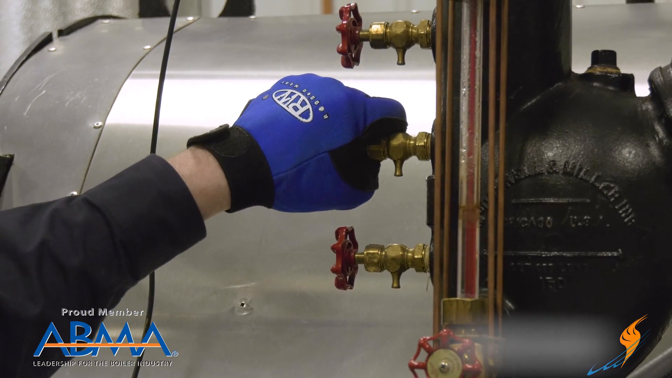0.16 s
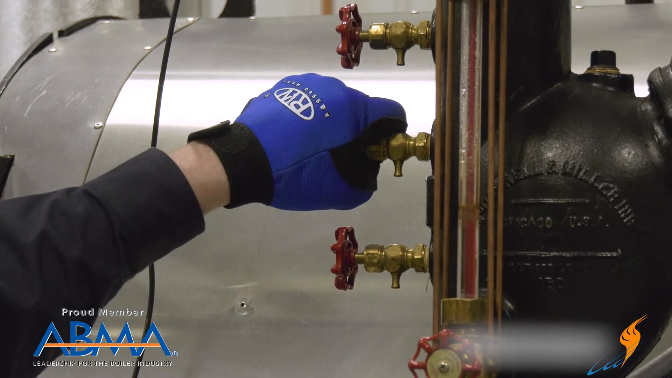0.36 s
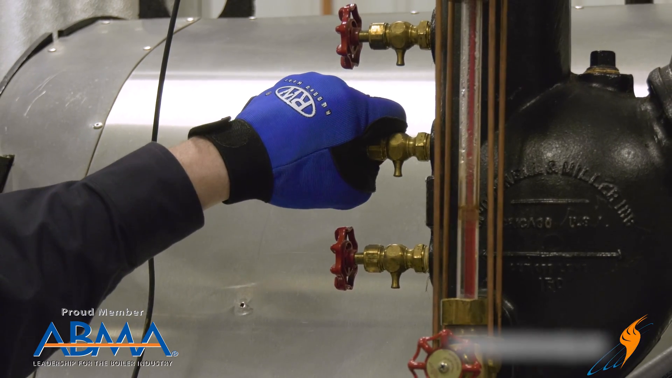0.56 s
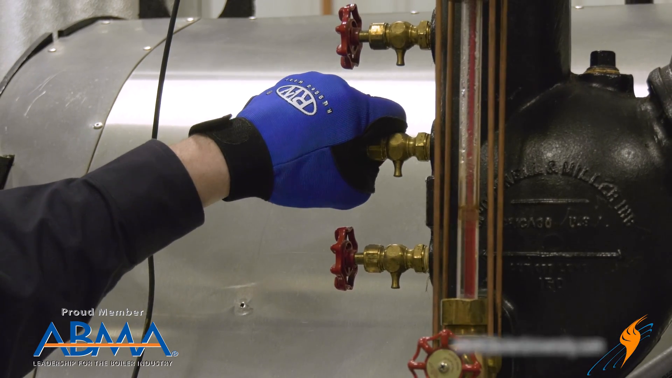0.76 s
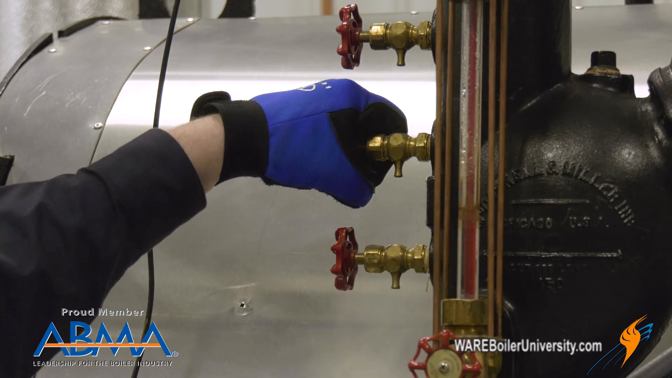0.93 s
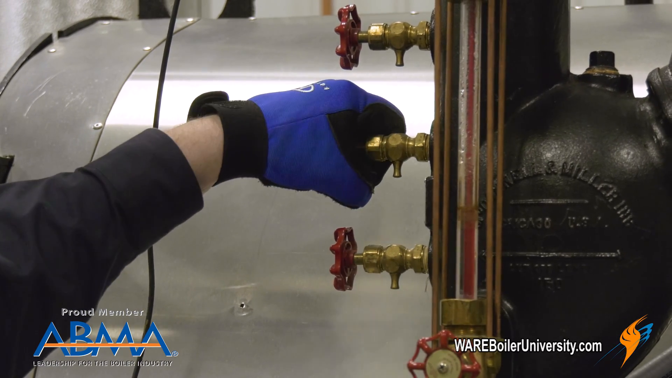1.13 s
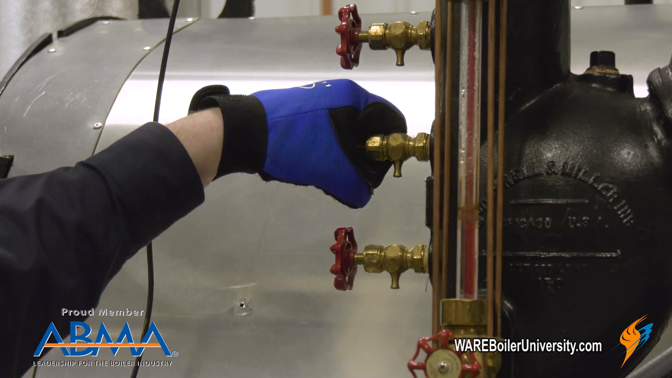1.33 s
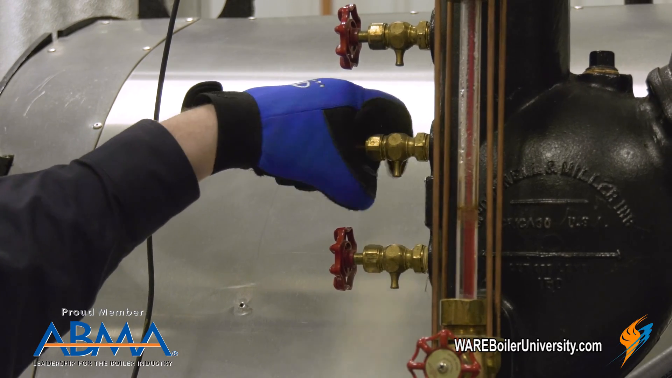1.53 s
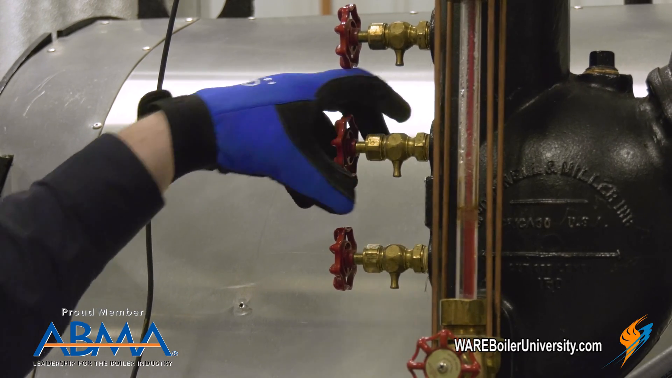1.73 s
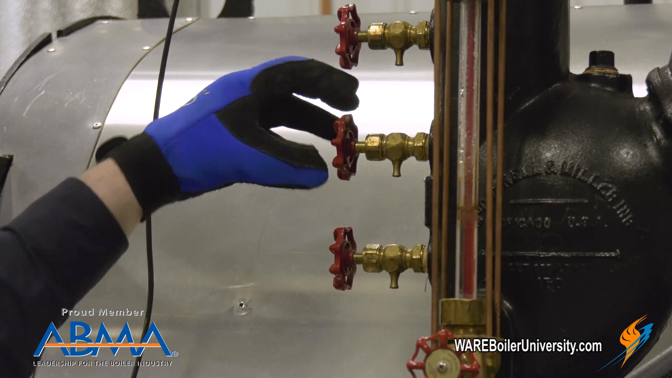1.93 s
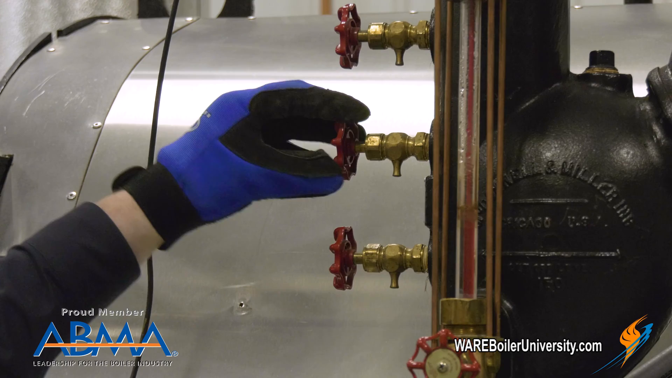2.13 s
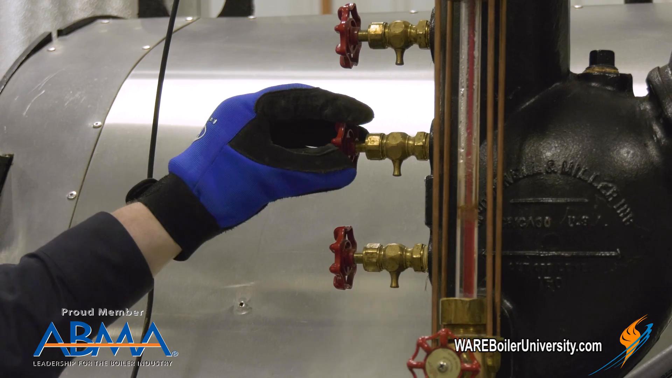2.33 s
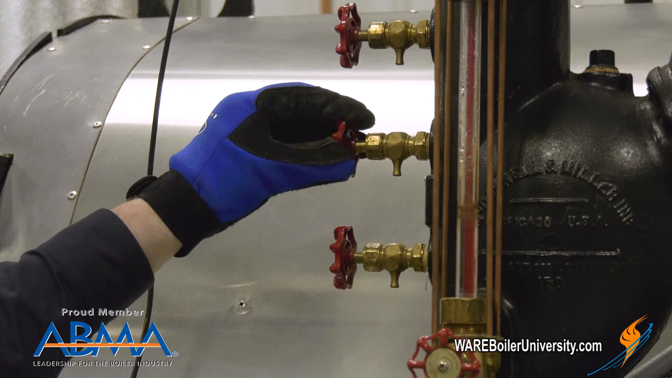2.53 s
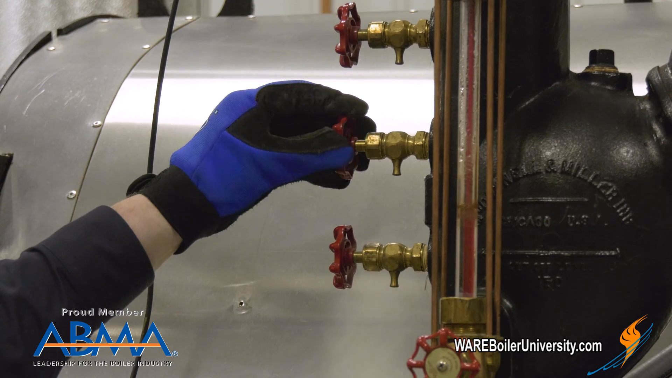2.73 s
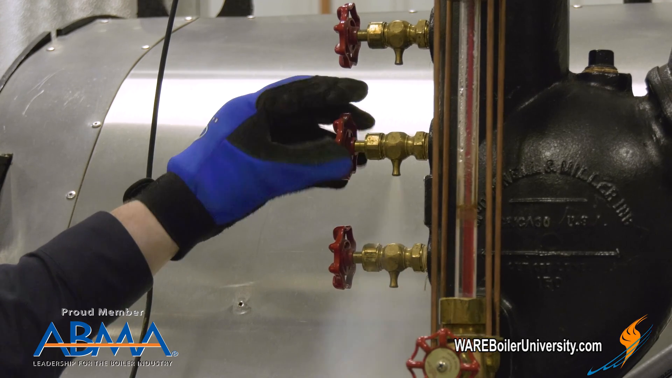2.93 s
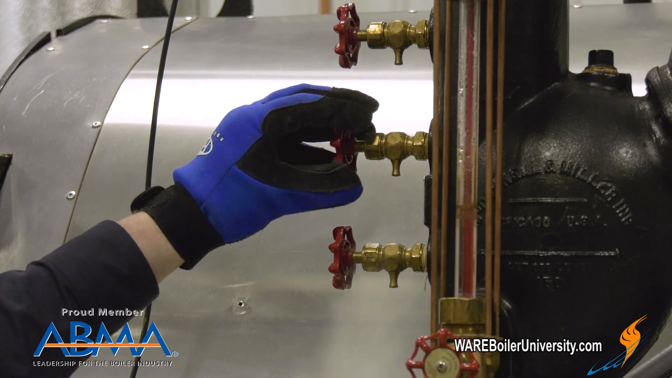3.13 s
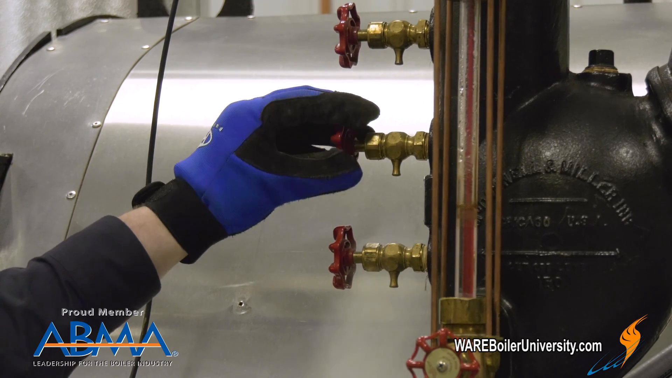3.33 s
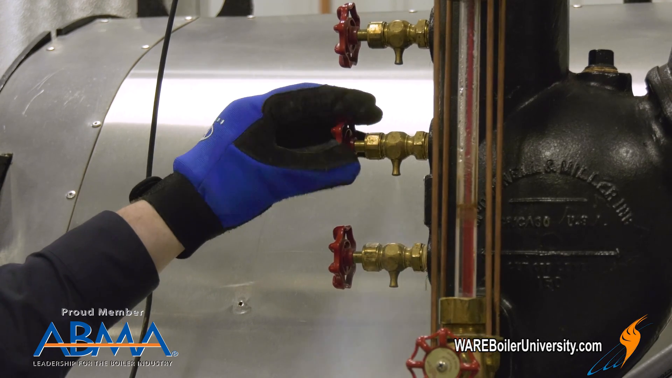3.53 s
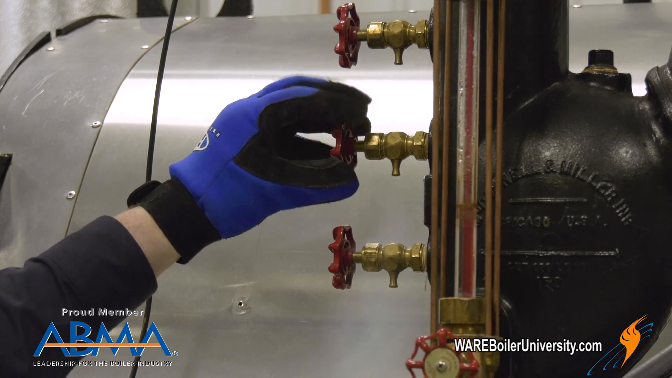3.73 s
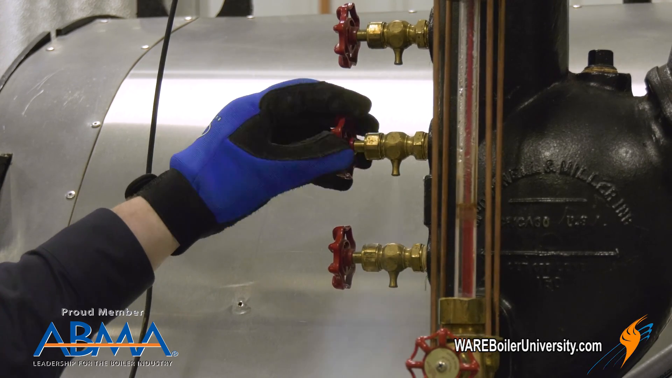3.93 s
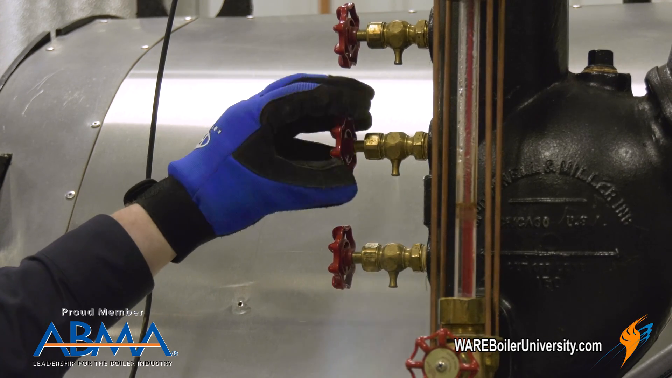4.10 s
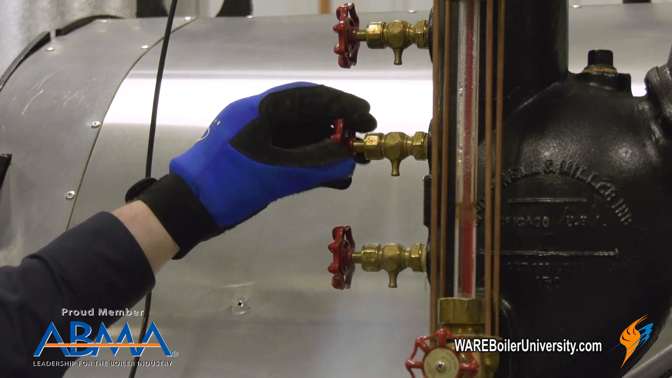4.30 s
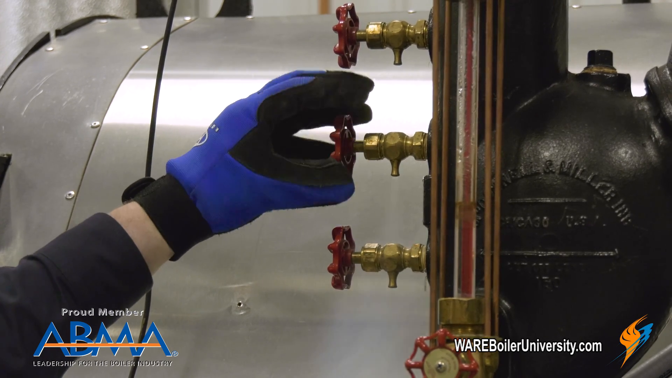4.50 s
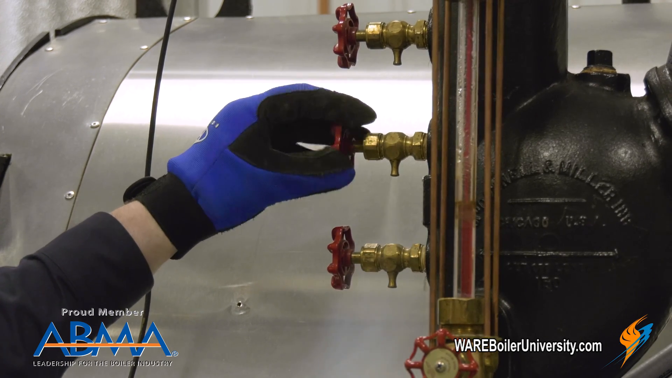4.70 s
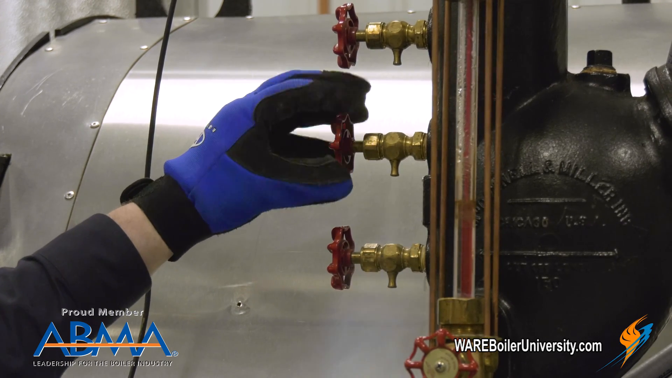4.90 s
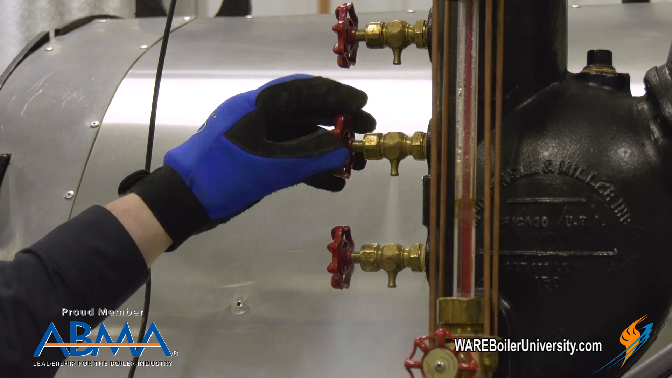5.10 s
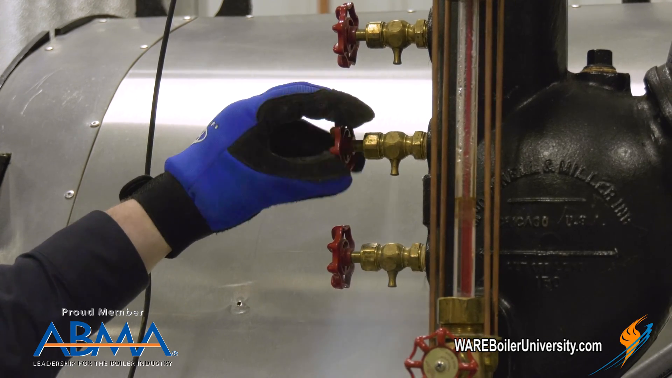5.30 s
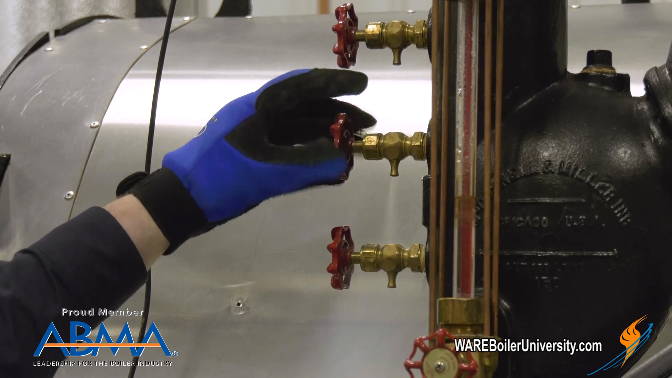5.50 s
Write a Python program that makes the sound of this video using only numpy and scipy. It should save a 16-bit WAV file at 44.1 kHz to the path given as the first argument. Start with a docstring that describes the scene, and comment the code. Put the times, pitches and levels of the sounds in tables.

```python
"""Steam hisses through a small boiler drain valve turned open by hand, and swells to a roar turn by turn.
Its jet is noise with flecks of water, coloured by the opening, the wetness and the ringing valve body.
First a slug of condensate bursts out with a falling squeal, and the valve spits: short noise bursts and
a gliding sine, with a thin room tail. All is heard close to one microphone in a workshop of steady
machinery noise, with a motor's hum and a motor drive's whine made of sines."""
import sys
import numpy as np
from scipy import signal
from scipy.fft import rfft, irfft
from scipy.io import wavfile
from scipy.ndimage import uniform_filter1d

SR = 44100
rng = np.random.default_rng(int(sys.argv[2]) if len(sys.argv) > 2 else 0)


def file_out(sig):
    """Save sig as 16-bit WAV at sys.argv[1]."""
    # one column per channel
    cols = np.atleast_2d(sig).T
    # limit, then scale
    lim = np.clip(cols, -1, 1)
    pcm = np.round(lim * 32767).astype(np.int16)
    wavfile.write(sys.argv[1], SR, pcm)


N = 244755
# the time of every sample in seconds, and the frequency of every spectrum bin in Hz
T, HZ = np.arange(N) / SR, np.fft.rfftfreq(N, 1 / SR)


def gain_of(db):
    """Turns decibels into a factor for the sound pressure."""
    return 10 ** (np.asarray(db) / 20)


def evened(x):
    """Scales a signal to an rms of 1, so that a level set later is its true loudness."""
    return x / np.sqrt(np.mean(x ** 2) + 1e-20)


def read(points, hz):
    """Reads every column of a spectrum table, in straight lines over log frequency."""
    f, *columns = np.transpose(points)
    return np.array([np.interp(np.log(hz + 1), np.log(f + 1), c) for c in columns])


def follow(rows, t):
    """Reads every column of a table of points in time, in straight lines."""
    s, *columns = np.transpose(rows)
    return np.array([np.interp(t, s, c) for c in columns])


def bell(x, centre, width):
    """A rounded peak of height 1."""
    return np.exp(-.5 * ((x - centre) / width) ** 2)


def above(hz, edge_hz):
    """A steep smooth step from 0 to 1 at the edge."""
    return 1 / (1 + (edge_hz / (hz + 1)) ** 24)


def noise(gain):
    """Random noise of rms 1, shaped by a gain at every frequency."""
    return evened(irfft(rfft(rng.standard_normal(N)) * gain, N))


def flutter(rate_hz):
    """Slow random unsteadiness of rms 1, with changes up to about the given rate."""
    return noise(HZ / (HZ + 3) / (1 + (HZ / rate_hz) ** 2))


def tones(rows):
    """Steady sines, each starting at a random point of its cycle."""
    total = 0
    for hz, db in rows:
        cycles = hz * T + rng.random()
        total = total + np.sqrt(2) * gain_of(db) * np.sin(2 * np.pi * cycles)
    return total


# Colour of the machinery noise. Each row: frequency in Hz, relative level in dB per Hz.
MACHINERY_COLOUR = [(25, -32), (50, -8), (110, 6), (160, 1), (280, -1.5), (450, -5), (750, -10),
                    (1050, -10.5), (1600, -12), (1950, -16), (3500, -18), (6000, -21.5), (9500, -27),
                    (15000, -34)]
# Hollow bands in that noise. Each row: middle in Hz, half width in Hz, lift in dB.
MACHINERY_BANDS = [(1240, 41, 5), (1470, 37, 7), (2100, 43, 6), (3600, 130, 5.5), (4420, 110, 8)]
# Level of the workshop. Each row: time in seconds, machinery noise in dB, swell of drone and hum in dB.
WORKSHOP_LEVEL = [(0.25, -55, -2), (0.43, -57.5, -3.5), (1.4, -59, 3), (2.0, -63, -4)]
# Hum of a motor. Each row: frequency in Hz, level in dB before the swell.
MOTOR_HUM = [(59.2, -70), (118.4, -60.5), (236.9, -75.5), (307, -72)]
# Switching whine of a motor drive with its sidebands. Each row: frequency in Hz, average level in dB.
DRIVE_WHINE = [(7932, -77), (8000, -80), (8069, -71)]


def workshop(hum_waver_db=1.0, whine_waver_db=0.7, drone_hz=85, drone_width_hz=24, drone_db=-62):
    """Machinery is broad noise and a narrow low drone; the motor and its drive sing in steady tones."""
    noise_db, swell_db = follow(WORKSHOP_LEVEL, T)
    colour_db = read(MACHINERY_COLOUR, HZ)[0]
    colour_db = colour_db + sum(db * bell(HZ, hz, width) for hz, width, db in MACHINERY_BANDS)
    machinery = noise(gain_of(colour_db)) * gain_of(noise_db)
    drone = gain_of(drone_db) * noise(bell(HZ, drone_hz, drone_width_hz))
    hum = tones(MOTOR_HUM) * gain_of(hum_waver_db * flutter(3.3))
    whine = tones(DRIVE_WHINE) * gain_of(whine_waver_db * flutter(4.5))
    return machinery + (drone + hum) * gain_of(swell_db) + whine


# First blast of spray as the seat lifts: it grows steadily, then breaks off.
BLAST_S, BLAST_LENGTH_S, BLAST_GROWTH_DB_PER_S = 0.887, 0.103, 118
BLAST_THUMP_DB, BLAST_HISS_DB, BLAST_FIZZ_DB = -65, -50.5, -48.5  # levels at its start
# Slugs of water gurgling through the spout.
# Each row: start in seconds, length in seconds, level of the gurgle in dB, pitch in Hz.
# Here and in the next two tables, the shortest bursts fade out before they reach their full level.
SLUGS = [(0.888, 0.015, -52, 1310), (0.902, 0.018, -31, 800), (0.924, 0.015, -28, 644),
         (0.937, 0.041, -37, 1150), (1.259, 0.0043, -37, 1390), (1.38, 0.0056, -36.5, 1200),
         (1.454, 0.0091, -41, 1600), (1.56, 0.0032, -41, 1400), (1.625, 0.038, -38, 1060),
         (2.997, 0.034, -33.5, 1360), (3.06, 0.054, -34, 1050), (3.987, 0.05, -29.5, 1050)]
SLUG_THUMP_DB, SLUG_HISS_DB, SLUG_FIZZ_DB = -19.5, -14.5, -22  # relative to the gurgle
# Knocks of water hammering in the pipe. Each row: start in seconds, length in seconds, thump in dB.
KNOCKS = [(0.962, 0.007, -33.5), (0.975, 0.0063, -33)]
KNOCK_HZ, KNOCK_GURGLE_DB = 650, 0  # pitch of their gurgle, and its level relative to the thump
# Spits of spray. Each row: start in seconds, length in seconds, level of the fizz in dB.
SPITS = [(1.37, 0.004, -44), (1.386, 0.0046, -33), (1.458, 0.004, -37), (1.484, 0.006, -37.5),
         (1.618, 0.033, -42)]
SPIT_HISS_DB = -5.5  # relative to the fizz
# Colours of a gurgle, of the hiss of spray and of its fizz.
# Each row: frequency in Hz, relative level in dB per Hz.
GURGLE_COLOUR = [(150, -20), (350, -7.5), (550, 0.5), (950, -5.5), (1300, 0), (1650, -2), (2050, -4.5),
                 (2600, -22), (4000, -48)]
SPRAY_COLOUR = [(1800, -15), (2700, 4), (3400, 8.5), (4500, 5), (6200, 8), (8200, 2), (9500, -28)]
FIZZ_COLOUR = [(7500, -33), (8700, 5), (10200, 1), (10900, -5), (12800, -3), (15700, -7)]


def spits(edge_s=0.0055, thump_hz=170, bubble_db=8, bubble_width=0.17):
    """Each slug of water thumps, gurgles in the spout at its own pitch and tears into spray."""
    thump = noise((HZ / (HZ + 50)) ** 2 / (1 + (HZ / thump_hz) ** 2))
    spray = noise(gain_of(read(SPRAY_COLOUR, HZ)[0]))
    fizz = noise(gain_of(read(FIZZ_COLOUR, HZ)[0]))
    gurgle_colour = read(GURGLE_COLOUR, HZ)[0]

    def gurgle(hz):
        """Water bubbling in the spout: noise that is strongest around one pitch."""
        return noise(gain_of(gurgle_colour + bubble_db * bell(HZ, hz, bubble_width * hz)))

    def gate(s, length):
        """Lets a burst through, with short straight fades centred on its start and end."""
        return np.clip(np.minimum(T - s, s + length - T) / edge_s + .5, 0, 1)

    growth = gain_of(BLAST_GROWTH_DB_PER_S * np.clip(T - BLAST_S, 0, BLAST_LENGTH_S))
    blast = gain_of([BLAST_THUMP_DB, BLAST_HISS_DB, BLAST_FIZZ_DB]) @ [thump, spray, fizz]
    out = gate(BLAST_S, BLAST_LENGTH_S) * growth * blast
    splash = gain_of([SLUG_THUMP_DB, SLUG_HISS_DB, SLUG_FIZZ_DB]) @ [thump, spray, fizz]
    for s, length, db, hz in SLUGS:
        out += gate(s, length) * gain_of(db) * (gurgle(hz) + splash)
    for s, length, db in KNOCKS:
        knock = thump + gain_of(KNOCK_GURGLE_DB) * gurgle(KNOCK_HZ)
        out += gate(s, length) * gain_of(db) * knock
    for s, length, db in SPITS:
        spit = fizz + gain_of(SPIT_HISS_DB) * spray
        out += gate(s, length) * gain_of(db) * spit
    return out


def room(x, low_t60=0.86, high_t60=0.35, gap_s=.006, bass_db=-6):
    """Echoes merge into a thin, diffuse tail whose treble dies first (t60: seconds to fall by 60 dB)."""
    hz, t, z = signal.stft(rng.standard_normal(SR), SR, nperseg=256)
    t60 = np.interp(hz, [2000, 15000], [low_t60, high_t60])[:, None]
    colour_db = np.interp(hz, [1000, 3000], [bass_db, 0])[:, None]
    fading = gain_of(colour_db - 60 * t / t60) * (t > gap_s)
    tail = signal.istft(z * fading, SR, nperseg=256)[1]
    return signal.fftconvolve(x, tail / np.linalg.norm(tail))[:N]


# Squeal of the valve seat: the pitch falls ever faster as the gap widens.
SQUEAL_S, SQUEAL_LENGTH_S, SQUEAL_DB = 0.971, 0.017, -26.5
SQUEAL_TOP_HZ, SQUEAL_FALL_HZ, SQUEAL_BEND = 15800, 6760, 1.2
SQUEAL_ATTACK_S, SQUEAL_RELEASE_S = 0.0027, 0.0014


def squeal(waver=0.0146, rough_db=0.0):
    """The narrow seat whistles, and the pitch drops as it lifts."""
    age = np.clip(T - SQUEAL_S, 0, 2 * SQUEAL_LENGTH_S)
    hz = SQUEAL_TOP_HZ - SQUEAL_FALL_HZ * (age / SQUEAL_LENGTH_S) ** SQUEAL_BEND
    cycles = np.cumsum(hz * (1 + waver * flutter(900))) / SR
    whistle = np.sqrt(2) * np.sin(2 * np.pi * cycles)
    attack = np.minimum(age / SQUEAL_ATTACK_S, 1)
    release = np.exp(-np.maximum(T - SQUEAL_S - SQUEAL_LENGTH_S, 0) / SQUEAL_RELEASE_S)
    return whistle * gain_of(SQUEAL_DB + rough_db * flutter(600)) * attack * release


# Turns of the handwheel.
# Each row: start in seconds, length in seconds, share of the full opening that the turn adds (0-1).
WHEEL_TURNS = [(1.131, 0.27, 0.04), (2.46, 0.7, 0.19), (3.32, 0.33, 0.24), (3.878, 0.13, 0.23),
               (4.048, 0.55, 0.17)]
LEAK = 0.03  # share of the full opening once the seat has lifted, before these turns
# Surges of the flow. Each row: middle in seconds, half width in seconds, lift in dB.
SURGES = [(1.38, 0.043, 2), (1.76, 0.089, 2.5), (2.97, 0.089, 2.5), (4.1, 0.1, 0.5)]
# The steam runs wet until the condensate is gone, then dries gradually (half as wet after DRYING_S).
WET_UNTIL_S, DRYING_S = 1.57, 0.04


def valve(t):
    """Opening (0-1), wetness (0-1) and surge (dB): each turn of the wheel eases the valve further open."""
    opening = LEAK
    for s, length, step in WHEEL_TURNS:
        progress = np.clip((t - s) / length, 0, 1)
        opening = opening + step * np.sin(np.pi / 2 * progress) ** 2
    wet = 1 / (1 + np.maximum(t - WET_UNTIL_S, 0) / DRYING_S)
    surge_db = sum(db * bell(t, s, width) for s, width, db in SURGES)
    return np.clip(opening, 1e-3, 1), wet, surge_db


def boiler_shell(x, share=0.12, reach_s=.015):
    """The curved shell and pipework send back many short echoes, which ripple the spectrum."""
    taps = np.zeros(int(reach_s * SR))
    taps[rng.integers(90, len(taps), size=60)] = rng.choice([-1, 1], size=60)
    echoes = signal.oaconvolve(x, taps / np.linalg.norm(taps))[:N]
    return evened(x + share * echoes)


# Colour of the jet.
# Each row: frequency in Hz, then relative level in dB per Hz when wet, when throttled and when wide open.
JET_COLOUR = [(25, -45, -40, -19), (60, -19, -14, -3.5), (197, -7, -10, -0.5), (390, -8, 0.5, 0.0),
              (920, -2, 0, -0.9), (1640, -2.5, -10, -3), (2810, -12, -25.5, -8), (4860, -5.5, -11, -15),
              (8160, -7.5, -11, -14), (10500, -5, -17.5, -18.5), (15600, -17, -18, -22.5)]
# Resonances of valve body and spout.
# Each row: middle in Hz, half width in Hz, then lift in dB when wet, when throttled and when wide open.
CAVITY = [(1050, 148, 0.0, 1.5, 1.0), (1379, 154, 5.5, 6.0, 0.5), (1819, 86, 1.0, 2.5, 3.0),
          (2125, 256, 11.0, 10.0, 0.0), (2757, 152, 10.0, 8.5, 0.0), (3337, 182, 18.0, 15.5, 2.5),
          (3698, 109, 5.0, 3.5, 4.0), (4010, 144, 11.5, 7.5, 4.0), (4125, 42, 0.0, 6.0, 0.5),
          (4507, 238, 4.0, 4.0, 7.5), (4980, 160, 0.0, 0.0, 3.0), (5380, 330, 3.5, 0.5, 7.0),
          (6064, 212, 4.5, 5.5, 7.0), (6563, 160, 1.0, 2.0, 4.0), (6920, 330, 0.5, 5.0, 3.5),
          (7454, 161, 2.5, 5.0, 3.0), (8188, 60, 0.0, 1.0, 2.5), (8601, 84, 4.0, 5.0, 2.0),
          (8881, 208, 8.5, 9.0, 6.5), (9570, 330, 11.0, 10.5, 6.0), (9635, 70, 0.5, 2.0, 2.0),
          (10275, 249, 7.5, 8.0, 3.5), (11124, 99, 0.0, 2.5, 3.5), (11786, 266, 1.0, 3.0, 5.5),
          (12710, 239, 2.5, 7.5, 6.0), (13042, 57, 1.0, 3.5, 0.0), (13545, 211, 7.0, 7.5, 4.0),
          (14312, 171, 10.0, 11.0, 3.5), (14880, 154, 16.5, 10.5, 2.0), (15115, 94, 0.0, 6.5, 3.0),
          (15494, 169, 15.5, 9.0, 3.5)]
# Treble lift of fine mist: lift in dB, best opening, spread in log opening, and dB without it.
MIST_DB, MIST_OPENING, MIST_SPREAD, NO_MIST_DB = 7, 0.43, 1.13, -2
SURGE_MIST = 0.28  # dB of mist per dB of surge


def turbulence(hz, t, patchy_db, mist_low_hz=8300, mist_full_hz=11200):
    """Wetness and opening set the colour of the flow and how much the cavity rings; eddies make it patchy."""
    opening, wet, surge_db = valve(t)
    mist = bell(np.log(opening), np.log(MIST_OPENING), MIST_SPREAD)
    mist_db = NO_MIST_DB + MIST_DB * mist + SURGE_MIST * surge_db
    # how far the flow is wet, throttled and wide open at each moment
    shares = np.array([wet, (1 - wet) * (1 - opening), (1 - wet) * opening])
    states_db = read(JET_COLOUR, hz)
    for f, width, *lifts in CAVITY:
        states_db = states_db + np.outer(lifts, bell(hz, f, width))
    treble = np.interp(hz, [mist_low_hz, mist_full_hz], [0, 1])
    colour_db = states_db.T @ shares + np.outer(treble, mist_db)
    # random patches, smoothed over frequency and then over time
    patches = uniform_filter1d(rng.standard_normal(colour_db.shape), size=8, axis=0)
    eddies = evened(uniform_filter1d(patches, size=10, axis=1))
    return gain_of(colour_db), gain_of(patchy_db * eddies)


HISS_DB, CHURN_DB = -19.5, -24.5  # levels for an unchoked flow at full opening
CHOKE = 0.65  # opening beyond which the hiss hardly grows
WET_CHURN_DB = -0.5  # wet steam churns a little less


def jet(split_hz=2350, hiss_flutter_db=0.46, churn_flutter_db=0.1, sputter_db=1.85,
        drops_per_s=700, wet_drop=2.2, dry_drop=1.27):
    """Steam with flecks of water in it excites the valve body: a hiss above, a rougher churn below."""
    drops = (rng.random(N) < drops_per_s / SR) * 2 * rng.uniform(-1.0, 1, N)
    opening, wet, surge_db = valve(T)
    drop_size = np.interp(wet, [0, 1], [dry_drop, wet_drop])
    # a narrow gap sputters, a wide one runs evenly
    unsteady_db = np.interp(opening, [0, .6], [sputter_db, churn_flutter_db])
    drive = boiler_shell(rng.standard_normal(N) + drop_size * drops)
    hz, t, z = signal.stft(drive, SR, nperseg=1024, noverlap=768)
    colour, eddies = turbulence(hz, t, patchy_db=0.5)

    def band(share, core):
        """One part of the flow, set to unit power in the heart of its band before the eddies."""
        gain = colour / np.sqrt((colour[core] ** 2).sum(0) / len(hz))
        shaped = z * gain * eddies * share[:, None]
        return signal.istft(shaped, SR, nperseg=1024, noverlap=768)[1][:N]

    upper = above(hz, split_hz)
    hiss = band(upper, (hz > 2500) & (hz < 15500))
    churn = band(1 - upper, (hz > 300) & (hz < 2200))
    flow_db = 20 * np.log10(opening) + surge_db
    hiss_level = HISS_DB + flow_db - 10 * np.log10(1 + (opening / CHOKE) ** 2)
    churn_level = CHURN_DB + flow_db + WET_CHURN_DB * wet
    waver = flutter(19)  # shared by both parts
    hiss = hiss * gain_of(hiss_level + hiss_flutter_db * waver)
    churn = churn * gain_of(churn_level + unsteady_db * evened(.5 * waver + flutter(65)))
    fade_in = np.clip((T - 1.02) / 0.14, 0, 1)
    return (hiss + churn) * fade_in


def scene(spit_room_db=-12.5, squeal_room_db=-19):
    """All sources meet at one microphone, whose signal fills two equal channels."""
    water, whistle = spits(), squeal()
    echo = room(gain_of(spit_room_db) * water + gain_of(squeal_room_db) * whistle)
    mono = workshop() + water + echo + whistle + jet()
    return np.array([mono, mono])


EDGE_HZ = 15800  # top of the band


def record(dry, low_cut_hz=38):
    """The microphone's bass rolls off, then a steep filter limits the band at the top."""
    bass_cut = signal.butter(4, low_cut_hz, "high", fs=SR, output="sos")
    lean = signal.sosfilt(bass_cut, dry)
    band_limit = signal.firwin(1023, EDGE_HZ, window=("kaiser", 9), fs=SR)
    return signal.oaconvolve(lean, band_limit[None], "same")


dry = scene()
out = record(dry)
file_out(out)
```